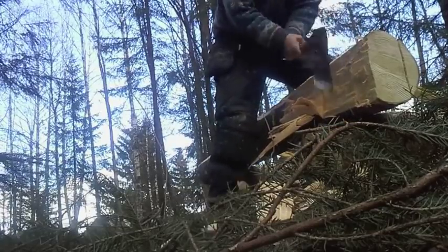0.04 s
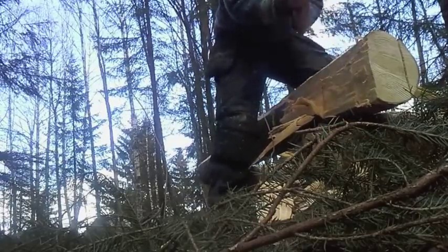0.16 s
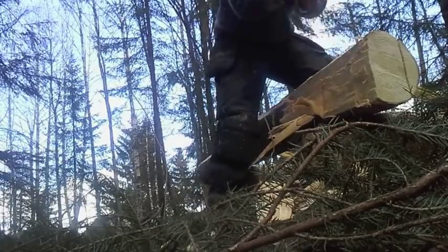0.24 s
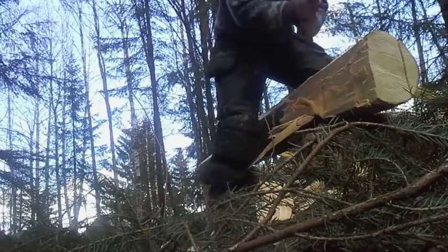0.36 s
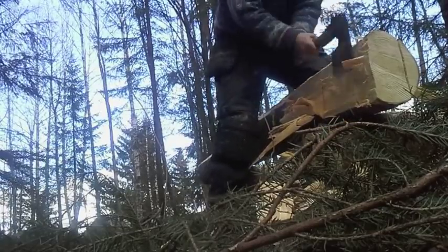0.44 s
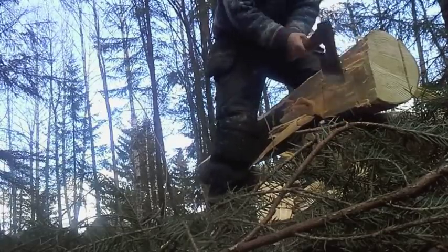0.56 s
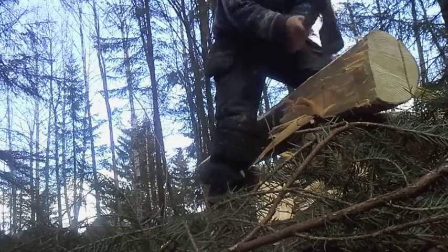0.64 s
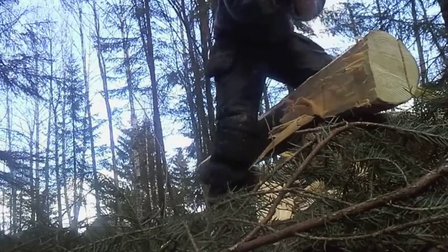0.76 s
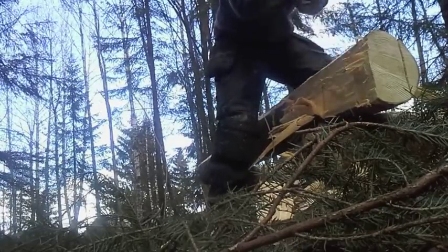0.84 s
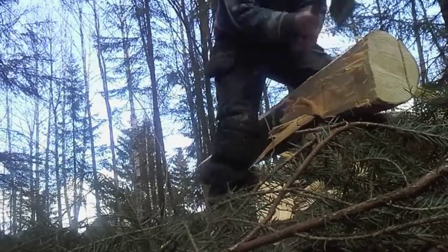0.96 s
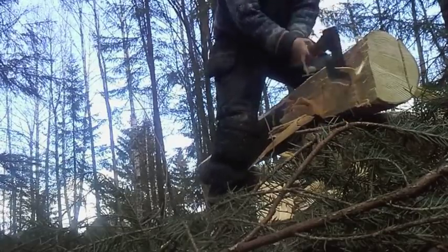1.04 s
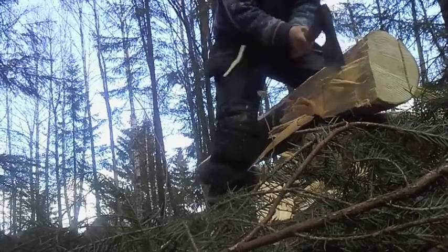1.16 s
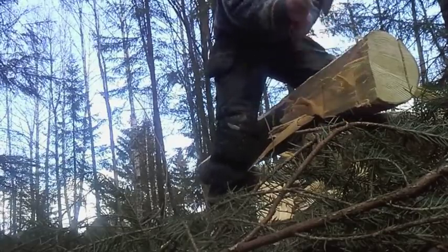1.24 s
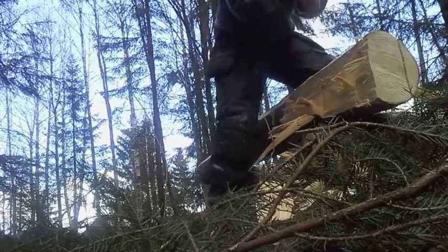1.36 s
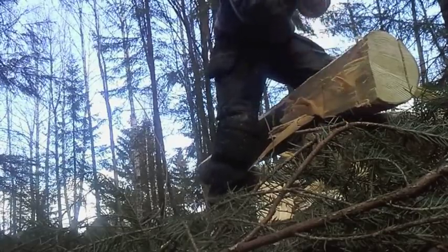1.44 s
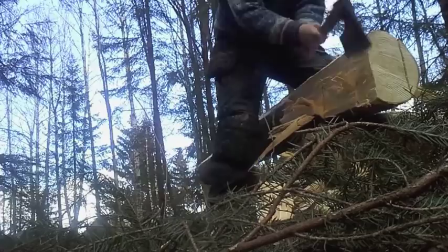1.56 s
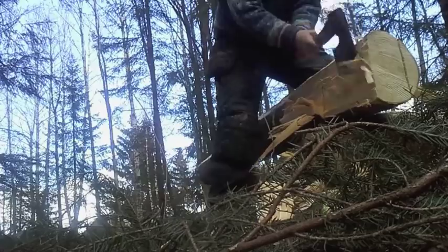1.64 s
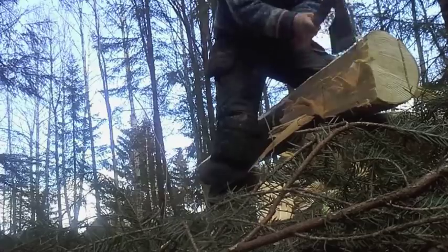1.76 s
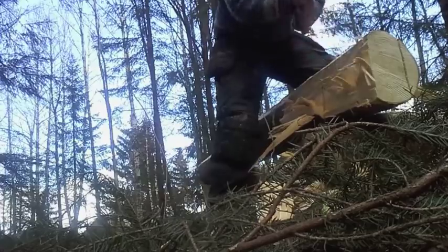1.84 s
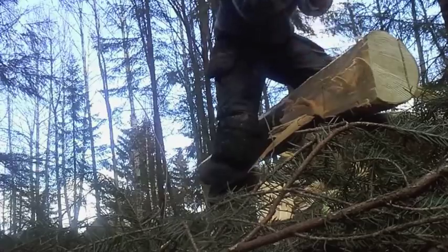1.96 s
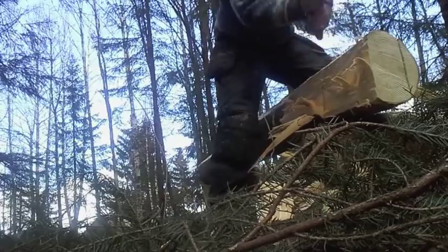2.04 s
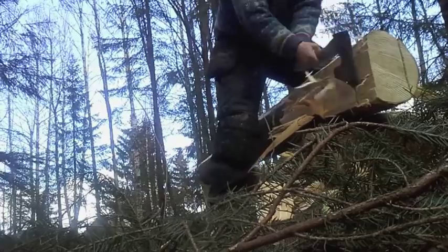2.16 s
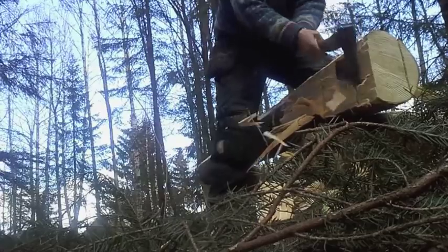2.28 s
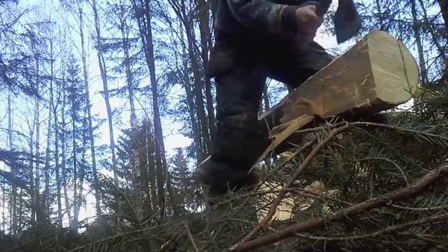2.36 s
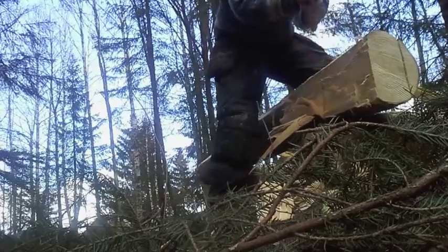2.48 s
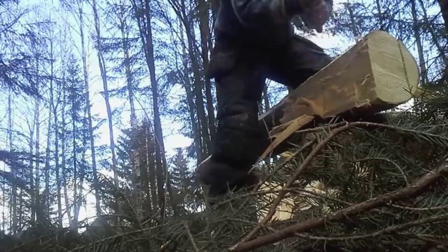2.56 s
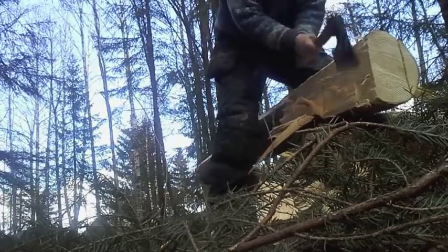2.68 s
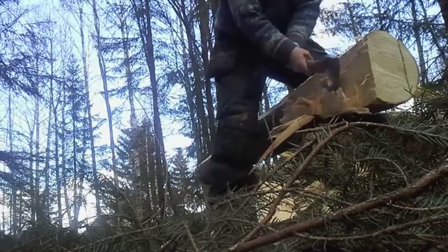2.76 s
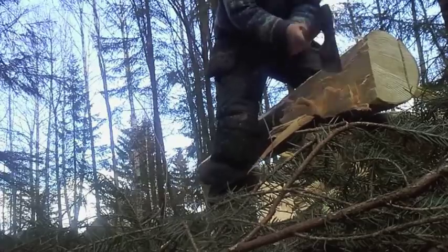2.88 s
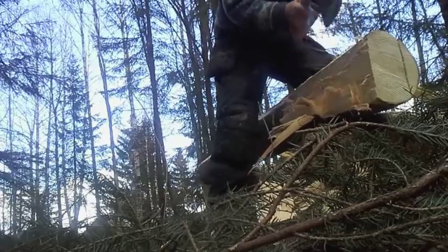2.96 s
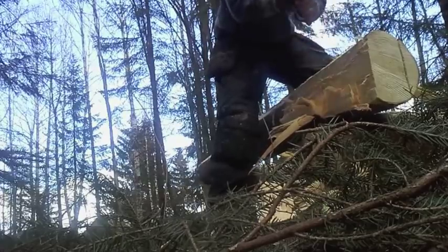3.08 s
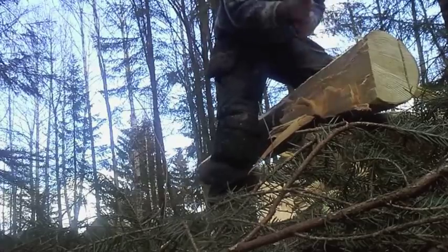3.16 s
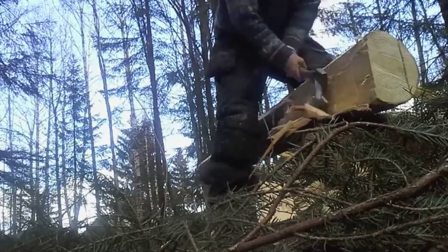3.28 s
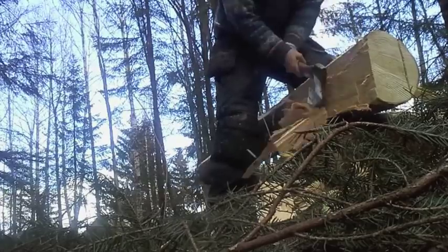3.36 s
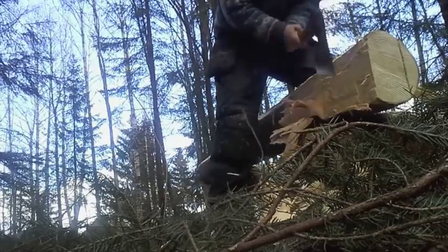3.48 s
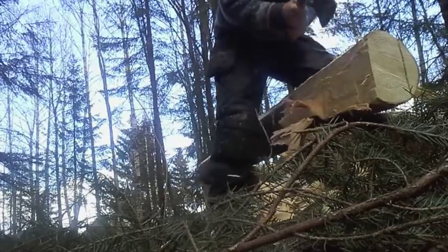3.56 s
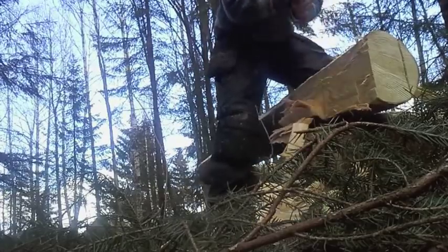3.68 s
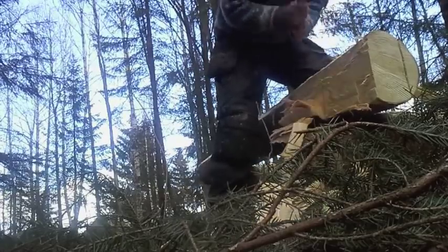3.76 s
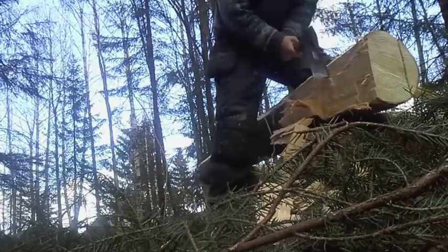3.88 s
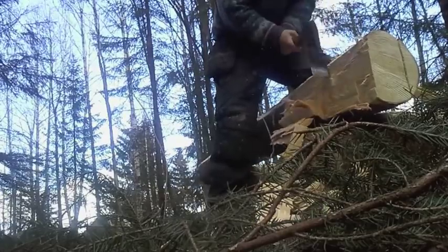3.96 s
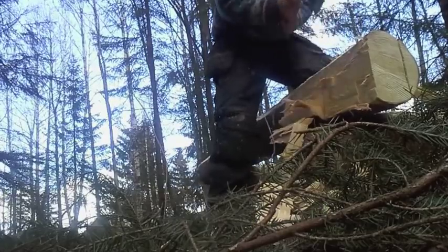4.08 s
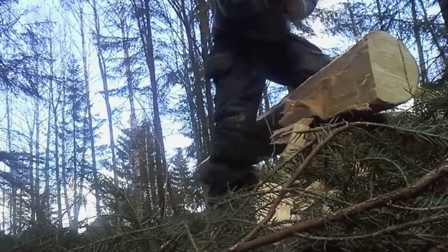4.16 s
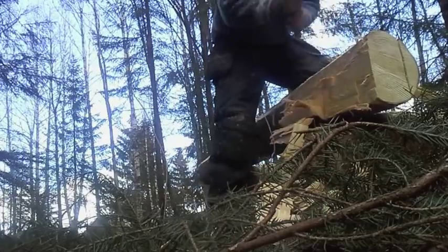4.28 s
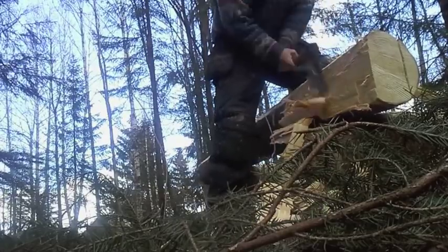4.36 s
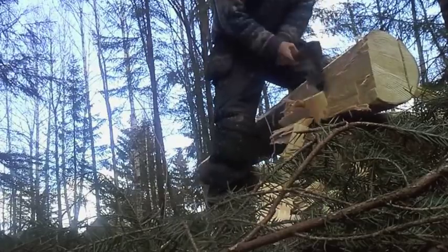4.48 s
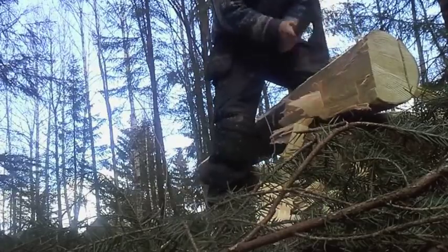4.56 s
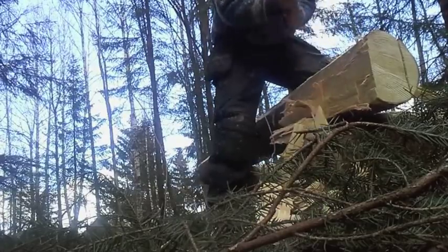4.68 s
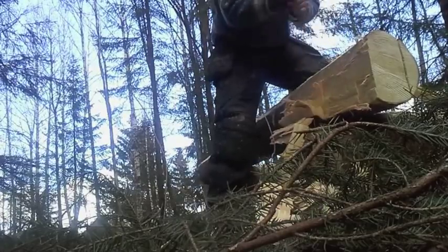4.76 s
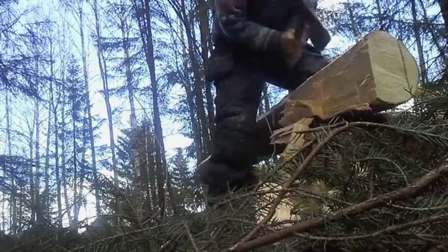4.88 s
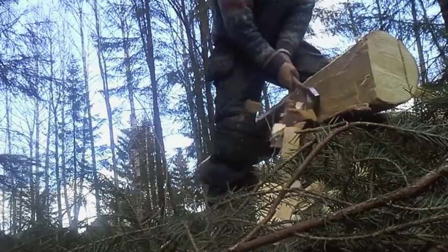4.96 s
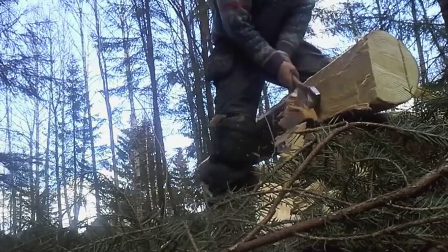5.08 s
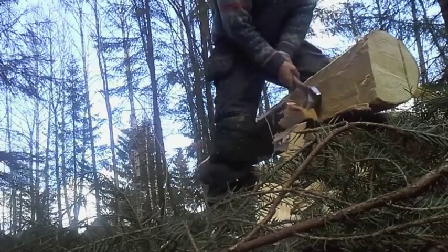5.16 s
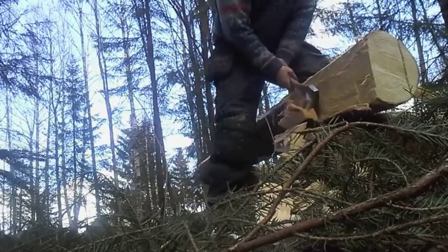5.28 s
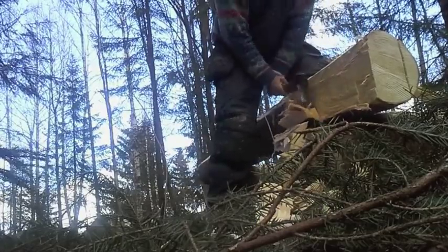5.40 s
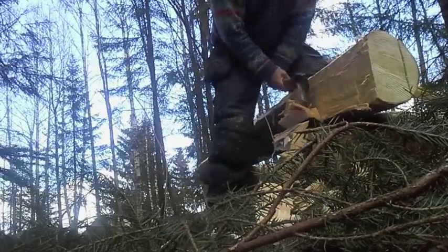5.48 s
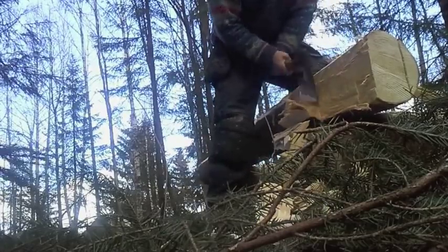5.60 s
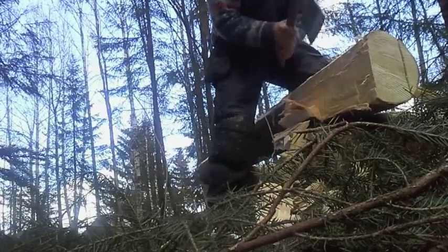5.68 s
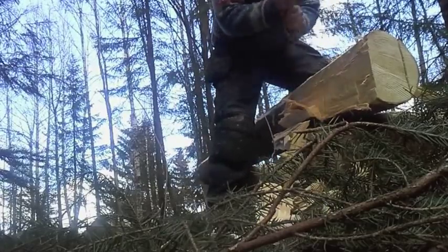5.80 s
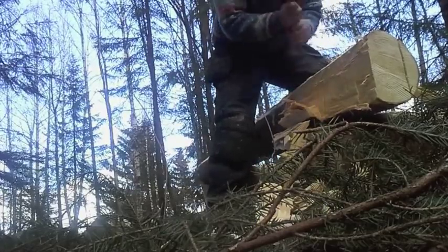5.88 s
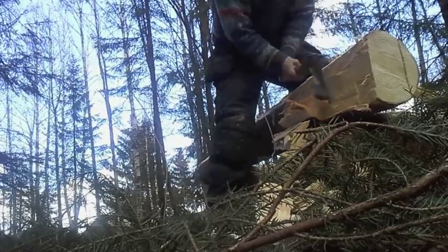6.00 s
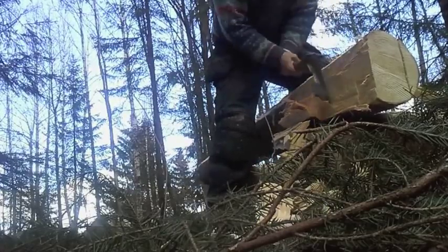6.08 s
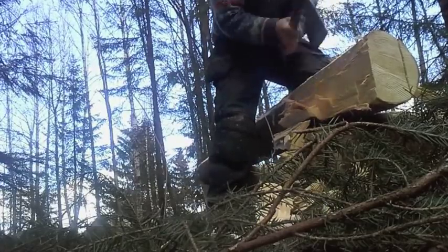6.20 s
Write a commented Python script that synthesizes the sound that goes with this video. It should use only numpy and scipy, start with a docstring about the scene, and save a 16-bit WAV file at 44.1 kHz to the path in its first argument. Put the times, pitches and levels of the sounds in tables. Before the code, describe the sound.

An axe hews a spruce log in a quiet forest, sharp cracking chops nearly two a second, splinters snapping and small birds singing faintly.

```python
"""Axe on a spruce log

An axe hews the side of a log in a quiet forest, nearly two chops a second. Noise bursts model the breaking fibres,
decaying sines the modes of log and steel, and filtered clicks the splinters that snap off and the chips that land.
The trees scatter each blow back as decaying noise bands and small echoes. Needles and twigs rustle as dense clicks,
small birds sing far off in gliding sines, and shaped noise gives the forest murmur."""
import sys
import numpy as np
from scipy import signal
from scipy.fft import rfft, irfft
from scipy.io import wavfile

SR = 44100
rng = np.random.default_rng(int(sys.argv[2]) if len(sys.argv) > 2 else 0)


def materialize(psi):
    """Save the field psi as 16-bit PCM at rate SR to the path in sys.argv[1].

    A 1-D psi becomes a single channel; in a 2-D psi each row is a channel.
    """
    bounded = np.clip(np.atleast_2d(psi).T, -1, 1)
    quanta = np.round(bounded * 32767).astype(np.int16)
    wavfile.write(sys.argv[1], SR, quanta)


N = 275184

# chops: (time [s], time in the bark [s], tear length [s], tear level [dB], tear ring [Hz], tear treble [dB],
#         split delay [s], split level [dB], slab ring [Hz], then the log's answer: delay [s], main hum [dB],
#         lower modes [dB], upper modes [dB], thud [dB])
CHOPS = [(0.4857, 0.0068, .022, -20, 2870, 4, 0, -10.5, 4270, 0.0012, -18, -26.5, -27.5, -62.5),
         (1.0548, 0.0035, 0.012, -18, 1637, 5.5, 0.011, -24, 4310, 0.0018, -20.5, -27, -25.5, -62),
         (1.6207, 0.002, 0.013, -17.5, 1770, -5, 0.0039, -21, 1810, 0.0021, -21.5, -27.5, -22, -60),
         (2.1787, 0.0031, 0.018, -14, 1550, 9, 0.00063, -9.5, 4300, .002, -19, -18, -15, -29.5),
         (2.7486, 0.0086, 0.017, -11.5, 3430, 9.5, 0, -15, 2200, .001, -28, -30.5, -35, -27.5),
         (3.2934, 0, 0.029, -18.5, 3920, -19, 0.034, -8, 2040, 0.0084, -30.5, -29.5, -35, -48.5),
         (3.8787, 0.00045, 0.011, -17, 3110, 9.5, .004, -24, 2256, .005, -30, -46, -28, -41),
         (4.4191, 0.0036, 0.007, -14, 3050, 6, 0.0039, -16, 1328, 0.0025, -35.5, -35.5, -21.5, -53),
         (4.9625, 0.00029, 0.04, -20, 2300, -3, 0.00066, -11, 2294, 0.019, -17.5, -34.5, -20.5, -51.5),
         (6.038, 0.0005, 0.013, -18, 2840, 0, 0.0065, -23, 4220, 0.00507, -27, -34, -29, -52.5)]
# high modes of the wood and the buried blade, rung by every cut: (frequency [Hz], level [dB], decay t60 [s])
OVERTONES = [(1304, -27.5, 0.22), (1380, -34, 0.36), (1448, -30.5, .18), (1816, -24.5, 0.063),
             (2226, -30, 0.22), (2700, -20, 0.034), (3510, -25.5, 0.045), (4000, -18.5, 0.065),
             (4210, -21.5, 0.13), (7150, -25.5, 0.069), (7470, -25, 0.12)]
# spectrum of tearing wood: (frequency [Hz], relative level [dB per Hz])
WOOD_SPECTRUM = [(40, -41), (130, -20.5), (350, -4), (550, -15), (950, -9.5), (1600, -7), (2300, 2),
                 (3600, -3.5), (4450, 4.5), (5200, -5), (6200, -9.5), (7300, -2), (10000, -19),
                 (16000, -27)]
# the soft entry through the bark, level relative to the tear
BARK_DB, BARK_RING_HZ, BARK_TREBLE_DB = -12, 1400, -1.5
TEAR_RING_DB = -8.5  # ring of the wood relative to the tearing
# the slab gives way in one short, ringing crack
SPLIT_S, SPLIT_RING_DB, SPLIT_TREBLE_DB = 0.0047, 2, -7.5

# the loudest splinters snapping off the log: (time [s], peak level [dB], ring [Hz])
SNAPS = [(.4918, -9.5, 4700), (.5352, -10, 3720), (.5455, -4.5, 3000), (.5495, -18, 2400),
         (1.0615, 2.5, 3700), (1.625, 0, 4400), (1.6328, -4.5, 4530), (2.1992, -3, 7300),
         (2.2032, -1.5, 3000), (2.765, -7, 4410), (2.770, -14.5, 6000), (2.7841, -5.5, 5000),
         (3.3086, -9.5, 2345), (3.3195, -4, 2300), (3.8836, -2, 2300), (4.4632, -15, 3300),
         (4.985, -2, 5500), (5.0085, -4, 7200)]
# the larger chips landing in the brushwood: (time [s], peak level [dB], ring [Hz])
CHIPS = [(.1101, -34, 7200), (.675, -40.5, 7710), (.914, -46.5, 1804), (1.3553, -40, 3770),
         (1.414, -38, 502), (1.495, -33, 890), (2.4483, -42, 4560), (3.3912, -25, 3420),
         (3.5269, -33.5, 4530), (3.6691, -34, 1943), (3.682, -32, 592), (5.0515, -23, 4560),
         (5.1711, -36.5, 7240), (5.3453, -37.5, 4390), (5.4984, -37, 8160), (5.6276, -38.5, 3003),
         (6.1265, -33.5, 3780)]
# spectrum of a splinter or chip before its treble tilt: (frequency [Hz], relative level [dB per Hz])
CHIP_SPECTRUM = [(80, -22), (400, -10), (1000, -15), (2300, -4), (4400, 1), (6100, -10.5), (7400, 0.5),
                 (10000, -15), (16000, -10.5)]
# crumbs after every chop: fall time range [s], mean and spread of the peak level [dB], ring range [Hz]
CRUMB_FALL_S, CRUMB_DB, CRUMB_SPREAD_DB, CRUMB_RING_HZ = (0.074, 0.16), -49.5, 10, (2528, 7520)

# main, lower and upper modes of the log: (frequency [Hz], level [dB], decay t60 [s], build-up [s])
LOG_MAIN = [(310.5, 2.5, 0.33, 0.019), (347, -18.5, 0.33, 0.0079)]
LOG_LOW = [(185.8, -10, 0.39, 0.027), (212.3, -10, 0.32, 0.003), (246, -10, .12, 0.001)]
LOG_HIGH = [(385, -5.5, 0.064, 0.0017), (453.6, -0.5, 0.16, 0.0075), (608, -15, 0.2, 0.0027),
            (659, -14.5, 0.2, 0.0055), (732, -18.5, .16, 0.0019), (870, -15, 0.14, 0.00077)]
# the log still hums from an earlier chop: (main hum [dB], lower modes [dB], upper modes [dB], thud [dB])
EARLIER_BLOW = (-21, -31.5, -44, -60)
EARLIER_S = -.09  # before the start

# the blade pulled free: (time [s], click peak [dB], steel ring [dB], brightness of the touch [dB per octave])
PULLS = [(1.1665, -28, -39.5, 0.5), (2.287, -31.5, -50, 2.5), (2.8714, -29.5, -56, 11),
         (4.021, -37.5, -61, -0.5), (4.593, -39.5, -56.5, 7.5), (6.187, -31.5, -61, 7)]
# modes of the steel head: (frequency [Hz], level [dB], decay t60 [s])
STEEL = [(1720, -2.5, 0.5), (2604, -9.5, 0.24), (4170, 0.5, 0.236), (4470, 1, 0.057), (7060, -12, 0.095)]

# scatter from brush and trunks: (frequency [Hz], near level [dB], near t60 [s], far level [dB], far t60 [s])
FOREST = [(151, -16, 0.3, -21.5, 0.98), (510, -17.5, 0.13, -15, 0.95), (960, -11, .22, -19.5, 0.85),
          (1300, -15.5, 0.41, -17.5, 0.93), (3230, -22.5, 0.28, -29.5, 0.64), (4440, -24, 0.16, -28, 0.47),
          (5930, -26, 0.16, -34.5, .6), (7850, -15.5, 0.23, -35, .63), (15000, -6, 0.12, -34.5, .55)]

# boots, sleeves and falling wood stir the brushwood: (time [s], length [s], level [dB])
STIRS = [(0, 0.011, -45.5), (0.064, .07, -50.5), (0.182, 0.15, -64), (1.339, 0.063, -51),
         (1.485, 0.0087, -52.5), (2.354, 0.014, -49.5), (2.439, 0.015, -47), (2.509, 0.051, -61.5),
         (2.871, 0.045, -66), (3.387, 0.098, -62.5), (3.518, 0.006, -44.5), (3.65, 0.02, -44),
         (4.815, 0.04, -58), (5.168, 0.027, -58), (5.343, 0.089, -58), (5.486, 0.057, -65),
         (5.615, .014, -65)]
# spectrum of needles and twigs: (frequency [Hz], relative level [dB per Hz])
NEEDLES_SPECTRUM = [(200, -6.5), (800, 2.5), (2500, -1), (4400, 1), (6000, -4), (7500, 2.5), (10000, -3),
                    (13000, -4), (16000, -5.5)]
STIR_ATTACK_S, STIR_RELEASE_T60 = .008, .17
SHAKE_DB, SHAKE_T60 = -49.5, .4  # every chop also shakes the brushwood under the log

# bird motifs, note by note: (delay [s], length [s], start [Hz], middle [Hz], end [Hz], trill depth [Hz], level [dB])
TWO_WHISTLES = [(0, .17, 4740, 4640, 4533, 0, 1), (0.169, 0.13, 3975, 3824, 3757, 0, -.5)]
SEESAW = [(-.03, 0.016, 4780, 4440, 3550, 0.0023, -5), (0, 0.022, 2880, 3714, 4190, 0, -1),
          (.03, .038, 4100, 3230, 2620, 0, 3)]
UPSLUR = [(0, .08, 3174, 3524, 4410, 0, 0), (.074, 0.019, 4390, 3700, 3170, 0, -1)]
FLOURISH = [(0, .022, 2940, 3146, 2118, -1, -2.5), (.036, 0.036, 2549, 3095, 3700, 2, -3.5),
            (.105, .035, 2216, 2409, 2385, 5, -5), (.321, .039, 2044, 2280, 2216, 0, -2),
            (.456, .125, 3334, 3590, 3710, 480, 0.5), (.568, .03, 3110, 2650, 2270, 1, -7.5),
            (.615, .043, 2240, 3220, 2160, -1, 3), (0.97, .08, 2980, 3330, 3120, 292, 0.5)]
DOWNSLUR = [(0, .055, 5560, 4640, 4400, 0, 0)]
CHIRP = [(0, .061, 4730, 5150, 5620, 0, 2.5), (.065, .09, 3720, 3670, 3614, 0.0016, -3)]
# birds calling now and then: (time [s], motif, level [dB])
CALLS_OUT = [(-.035, TWO_WHISTLES, -59), (.405, UPSLUR, -56.5), (1.278, DOWNSLUR, -60),
             (1.49, DOWNSLUR, -63), (2.253, UPSLUR, -47.5), (2.74, TWO_WHISTLES, -58.5),
             (4.615, CHIRP, -68.5), (5.587, UPSLUR, -58), (5.66, TWO_WHISTLES, -64.5)]
# another bird runs through quick seesaws and ends in a flourish
SEESAW_START_S, SEESAW_EVERY_S, FLOURISH_S = 1.817, .162, 2.604
SEESAW_DB, FLOURISH_DB = -53.5, -52

# course of the distant forest murmur: (time [s], level [dB])
MURMUR = [(0, -59), (1, -60), (2, -55.5), (2.6, -59), (4.5, -60.5), (6.24, -61)]
# spectrum of the murmur: (frequency [Hz], relative level [dB per Hz])
AIR_SPECTRUM = [(25, -21), (45, -18), (90, -2.5), (130, 3), (200, -1.5), (400, -11), (1000, -18),
                (2500, -26.5), (4500, -31), (6000, -43), (16000, -30.5)]
CUTOFF_HZ = 16100  # the final low-pass


def cuts():
    """Staged fracture: a chop enters softly through bark, tears along the grain and splits off a slab."""
    tears, slabs = np.zeros(N), np.zeros(N)
    for s, bark_s, tear_s, tear_db, tear_hz, treble_db, split_delay, split_db, slab_hz, *_ in CHOPS:
        tear = fibres(tear_s, tear_db, tear_hz, TEAR_RING_DB, treble_db)
        split = fibres(SPLIT_S, split_db, slab_hz, SPLIT_RING_DB, SPLIT_TREBLE_DB)
        stages = [(s, tear), (s + split_delay, split)]
        if bark_s > 0:
            bark = fibres(bark_s, tear_db + BARK_DB, BARK_RING_HZ, TEAR_RING_DB, BARK_TREBLE_DB)
            stages.append((s - bark_s, bark))
        for start, (tearing, ringing) in stages:
            add(tears, start, tearing)
            add(slabs, start, ringing)
    return tears, slabs


def fibres(length, db, slab_hz, slab_db, treble_db, rise_s=.0007, release_t60=0.018, slab_width_hz=170,
           sag_db=7, crossing_s=.0021, reflection=.42, scatter_db=3):
    """Impulsive excitation of resonators: fibres break in quick succession and ring the slab and wood."""
    t = seconds(.25)
    slowing = from_db(-sag_db * np.minimum(t / length, 1))
    release = fade(np.maximum(t - length, 0), release_t60)  # the blade sticks
    force = (1 - np.exp(-t / rise_s)) * slowing * release
    breaks = force * crackle(per_s=9000, spread_db=2.5, size=len(t))
    lag_s = crossing_s * rng.uniform(.7, 1.3)
    tearing = rms_one(bounce(colour(breaks, WOOD_SPECTRUM, treble_db), lag_s, reflection))
    ringing = from_db(slab_db) * rms_one(resonate(breaks, slab_hz, slab_width_hz))
    for hz, mode_db, t60 in OVERTONES:
        width_hz = np.log(1000) / (np.pi * t60)
        mode = rms_one(resonate(breaks, hz, width_hz))
        ringing += from_db(mode_db + rng.normal(0, scatter_db)) * mode
    # the level is the rms over the stated length
    gain = from_db(db) * np.sqrt(length / t[-1]) / np.std(tearing + ringing)
    return gain * tearing, gain * ringing


def bounce(x, lag_s, reflection):
    """Wave reflection: a stress wave runs to and fro across the slab, a comb filter that sounds hollow."""
    feedback = np.zeros(int(lag_s * SR) + 2)
    feedback[0], feedback[-1] = 1, np.clip(reflection, 0, .8)
    return signal.lfilter([1], feedback, x)


def splinters(rows, crumble_db, crumble_t60, uneven_db, ring_db, width_hz):
    """Impulse response of a small body: a click and a short crumble ring in it; low rings are duller."""
    out, t = np.zeros(N), seconds(0.12)
    for s, db, hz in rows:
        crumble = crackle(per_s=7000, spread_db=uneven_db, size=len(t)) * fade(t, crumble_t60)
        clicks = from_db(crumble_db) * crumble
        clicks[0] = 1
        snap = colour(clicks, CHIP_SPECTRUM, treble_db=2.3 * np.log2(hz / 4500))
        sound = snap + from_db(ring_db) * resonate(clicks, hz, width_hz)
        add(out, s, from_db(db) * sound / np.abs(sound).max())
    return out


def crumbs(count=2):
    """Random impacts: small bits land after each chop, as rows of (time [s], peak level [dB], ring [Hz])."""
    rows = []
    for s, *_ in CHOPS:
        for _ in range(count):
            landing_s = s + rng.uniform(*CRUMB_FALL_S)
            rows.append((landing_s, rng.normal(CRUMB_DB, CRUMB_SPREAD_DB), rng.uniform(*CRUMB_RING_HZ)))
    return rows


def log_hum(thud_hz=88, thud_t60=0.045, contact_s=0.002):
    """Modal superposition: the log jolts on its supports; where the blade lands sets which modes speak."""
    out, t = np.zeros(N), seconds(.6)
    blows = [(EARLIER_S, *EARLIER_BLOW)]
    for s, *_, delay, main_db, low_db, high_db, thud_db in CHOPS:
        blows.append((s + delay, main_db, low_db, high_db, thud_db))
    for s, *levels_db, thud_db in blows:
        jolt = np.cos(2 * np.pi * thud_hz * t) * (1 - np.exp(-t / contact_s)) * fade(t, thud_t60)
        add(out, s, from_db(thud_db) * jolt)
        for db, modes in zip(levels_db, (LOG_MAIN, LOG_LOW, LOG_HIGH)):
            for hz, mode_db, t60, build_up in modes:
                swing = np.sin(2 * np.pi * (hz * t + rng.random()))
                envelope = (1 - np.exp(-t / build_up)) * fade(t, t60)
                add(out, s, from_db(db + mode_db) * swing * envelope)
    return out


def axe_head(click_hz=3800):
    """Free vibration of steel: the blade clicks out of the cut and rings; a bright touch favours high modes."""
    clicks = [(s, click_db, click_hz) for s, click_db, _, _ in PULLS]
    out = splinters(clicks, crumble_db=-14, crumble_t60=0.018, uneven_db=5, ring_db=12, width_hz=2100)
    t = seconds(0.41)
    for s, _, ring_db, tilt_db in PULLS:
        for hz, mode_db, t60 in STEEL:
            gain = from_db(ring_db + mode_db + tilt_db * np.log2(hz / 4000))
            add(out, s, gain * np.sin(2 * np.pi * hz * t) * fade(t, t60))
    return out


def forest(x, arrival_t60=0.0084):
    """Diffuse scattering: countless small echoes blur into noise, a near wash of brush and a far one of trunks."""
    out, table = np.zeros(N), np.array(FOREST)
    edges_hz = np.geomspace(120, 17000, 21)
    white = rng.standard_normal((2, N))  # neighbouring bands get unrelated noise
    for k, (low, high) in enumerate(zip(edges_hz, edges_hz[1:])):
        log_centre = np.log(low * high) / 2
        near_db, near_t60, far_db, far_t60 = [
            np.interp(log_centre, np.log(table[:, 0]), column) for column in table.T[1:]]
        band = signal.butter(2, [low, high], "band", fs=SR, output="sos")
        sent = linger(signal.sosfilt(band, x) ** 2, arrival_t60)
        near = from_db(near_db) ** 2 * linger(sent, near_t60)
        far = from_db(far_db) ** 2 * linger(sent, far_t60)
        out += np.sqrt(near + far) * rms_one(signal.sosfilt(band, white[k % 2]))
    return out


def linger(power, t60):
    """Energy conservation: power is spread over an exponential decay with its total unchanged."""
    r = np.exp(-2 * np.log(1000) / (t60 * SR))
    return signal.lfilter([1 - r], [1, -r], power + 1e-18)


def branches(x, paths_per_s=400, t60=.45, dull_hz=6000, first_s=.012):
    """Discrete reflections: the nearest trunks and branches return separate echoes that roughen the tail."""
    t = seconds(.5)
    onset = 1 - np.exp(-(t / first_s) ** 2)
    paths = crackle(per_s=paths_per_s, spread_db=3.5, size=len(t)) * onset * fade(t, t60)
    echoes = signal.fftconvolve(x, paths / np.sqrt(np.sum(paths ** 2)))[:N]
    dull = signal.butter(1, min(dull_hz, 15000), fs=SR, output="sos")
    return signal.sosfilt(dull, echoes)


def among_trunks(x, t60):
    """Multipath propagation: a tone returns over many paths, smeared in time but at its own pitch."""
    t = seconds(.6)
    paths = rms_one(rng.standard_normal(len(t)) * fade(t, t60)) / np.sqrt(len(t))
    return signal.fftconvolve(x, paths)[:N]


def brushwood(clump_db=5.0, clumps_per_s=120, restless_db=-80, twigs_db=-5, twigs_per_s=260):
    """Stochastic friction: as a stir swells and settles, needles brush in uneven clumps and dry twigs tick."""
    motion, t = np.full(N, from_db(restless_db)), seconds(0.56)
    swell = 1 - np.exp(-t / STIR_ATTACK_S)
    for s, length, db in STIRS:
        add(motion, s, from_db(db) * swell * fade(np.maximum(t - length, 0), STIR_RELEASE_T60))
    for s, *_ in CHOPS:
        add(motion, s, from_db(SHAKE_DB) * swell * fade(t, SHAKE_T60))
    knots = np.arange(N) / SR * clumps_per_s
    clumps = np.interp(knots, np.arange(N), rng.standard_normal(N))
    needles = rms_one(crackle(per_s=6600, spread_db=3.5, size=N) * from_db(clump_db * clumps))
    twigs = from_db(twigs_db) * crackle(per_s=twigs_per_s, spread_db=2.5, size=N)
    return motion * rms_one(colour(needles + twigs, NEEDLES_SPECTRUM))


def birds(direct_db=-4, scattered_db=-5, scatter_t60=0.52, trill_hz=130, unsteady=3):
    """Frequency modulation: gliding whistles and buzzy trills, smeared on their way through the trees."""
    out = np.zeros(N)
    song = repeated(SEESAW, SEESAW_START_S, SEESAW_EVERY_S, SEESAW_DB, count=5)
    song += [(FLOURISH_S, FLOURISH, FLOURISH_DB)] + CALLS_OUT
    for s, motif, db in song:
        for delay, length, start_hz, middle_hz, end_hz, depth_hz, note_db in motif:
            t = seconds(length)
            parabola = np.polyfit([0, .5, 1], [start_hz, middle_hz, end_hz], 2)
            glide = np.polyval(parabola, t / length)
            # the trill keeps loose time
            beats = np.cumsum(trill_hz * (1 + unsteady * rng.standard_normal(len(t)))) / SR
            hz = glide + depth_hz * np.sin(2 * np.pi * beats)
            whistle = np.sin(2 * np.pi * np.cumsum(hz) / SR)
            envelope = np.sqrt(np.sin(np.pi * t / length))
            add(out, s + delay, from_db(db + note_db) * envelope * whistle)
    return from_db(direct_db) * out + from_db(scattered_db) * among_trunks(out, scatter_t60)


def repeated(motif, start_s, every_s, db, count):
    """Periodic repetition: a motif at an even pace, as rows of (time [s], motif, level [dB])."""
    return [(start_s + k * every_s, motif, db) for k in range(count)]


def murmur():
    """Shaped noise: white noise takes the spectrum and the slow level course of the distant forest."""
    return level_curve(MURMUR) * rms_one(colour(rng.standard_normal(N), AIR_SPECTRUM))


def crackle(per_s, spread_db, size):
    """Poisson-like process: random clicks of uneven strength and either sign, with rms 1."""
    strength = from_db(spread_db * np.minimum(rng.exponential(1, size), 4)) * rng.choice([-1, 1], size)
    return rms_one(strength * (rng.random(size) < per_s / SR))


def resonate(x, hz, width_hz):
    """Damped resonance: a two-pole filter that keeps the power of white noise."""
    r = np.exp(-np.pi * width_hz / SR)
    poles = [1, -2 * r * np.cos(2 * np.pi * hz / SR), r * r]
    return np.sqrt((1 - r * r) / 2) * signal.lfilter([1, 0, -1], poles, x + 1e-18)


def colour(x, spectrum, treble_db=0):
    """Minimum-phase filtering: a causal filter of unit power with a given spectrum and a treble shelf."""
    size = 2048
    hz = np.maximum(np.fft.rfftfreq(size, 1 / SR), 1)
    points, db = np.transpose(spectrum)
    shelf_db = treble_db * hz ** 2 / (hz ** 2 + 5000 ** 2)
    gain = from_db(np.interp(np.log(hz), np.log(points), db) + shelf_db)
    # folding the cepstrum onto positive time gives the minimum phase
    cepstrum = irfft(np.log(rms_one(gain)))
    cepstrum[1:size // 2] *= 2
    cepstrum[size // 2 + 1:] = 0
    impulse_response = irfft(np.exp(rfft(cepstrum)))
    return signal.fftconvolve(x, impulse_response)[:len(x)]


def fade(t, t60):
    """Exponential damping: free decay by 60 dB in t60."""
    return np.exp(-np.log(1000) * t / t60)


def level_curve(rows):
    """Linear interpolation in decibels: gain through time from rows of (time [s], level [dB])."""
    return from_db(np.interp(np.arange(N) / SR, *np.transpose(rows)))


def add(out, s, sound):
    """Superposition: mix a sound in at time s, trimmed to the scene."""
    at = round(s * SR)
    part = sound[max(-at, 0):max(N - at, 0)]
    out[max(at, 0):max(at, 0) + len(part)] += part


def from_db(db):
    """Logarithmic level: decibels to amplitude gain."""
    return 10 ** (np.asarray(db) / 20)


def rms_one(x):
    """Normalisation: scale to unit power."""
    return x / np.sqrt(np.mean(x ** 2) + 1e-20)


def seconds(length):
    """Uniform sampling: time axis [s] of a sound."""
    return np.arange(int(length * SR)) / SR


def scene(hum_scatter_db=-11, slab_scatter_db=-8, slab_echo_db=-23, slab_echo_t60=0.48, branch_db=-25):
    """Superposition of sources: chops and their echoes over brushwood, birds and forest murmur."""
    tearing, slabs = cuts()
    snaps = splinters(SNAPS, crumble_db=-18.5, crumble_t60=0.018, uneven_db=6, ring_db=-2, width_hz=230)
    chips = splinters(CHIPS + crumbs(), crumble_db=-5, crumble_t60=0.011, uneven_db=7.5, ring_db=2.5,
                      width_hz=550)
    cracks = tearing + snaps + chips + axe_head() + brushwood()
    hum = log_hum()
    # the ring of the wood is heard mostly direct; the cracks carry into the trees
    echoes = forest(cracks + from_db(slab_scatter_db) * slabs + from_db(hum_scatter_db) * hum)
    echoes += from_db(slab_echo_db) * among_trunks(slabs, slab_echo_t60)
    echoes += from_db(branch_db) * branches(cracks)
    return (cracks + slabs + hum + echoes + birds() + murmur())[None]


def record(dry, top=0.96):
    """Soft saturation and low-pass: the loudest peaks are rounded off and the highest treble is cut."""
    rounded = top * np.tanh(dry / top)
    low_pass = signal.ellip(10, .1, 90, CUTOFF_HZ, fs=SR, output="sos")
    return signal.sosfilt(low_pass, rounded)


dry = scene()
out = record(dry)
materialize(out)
```